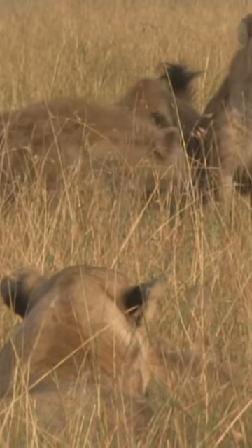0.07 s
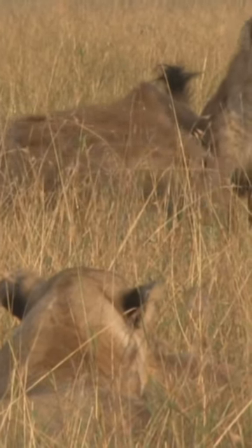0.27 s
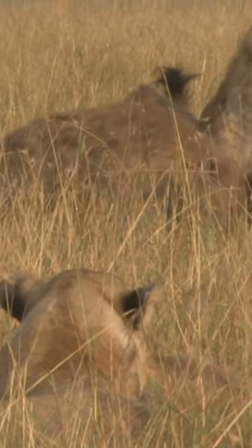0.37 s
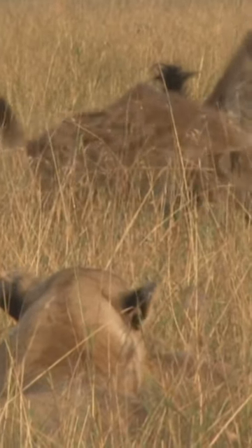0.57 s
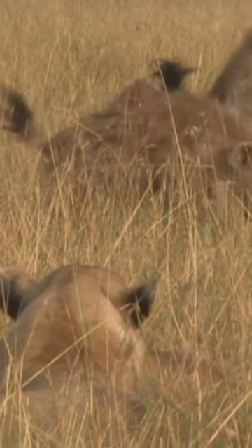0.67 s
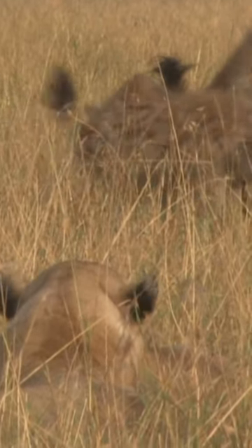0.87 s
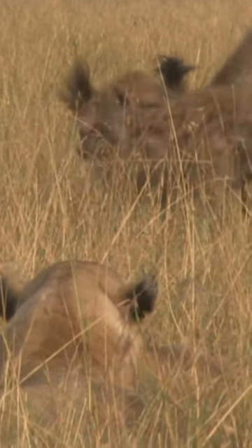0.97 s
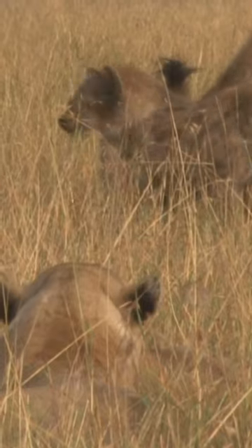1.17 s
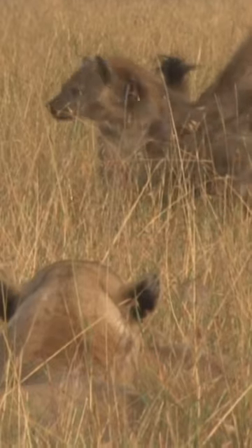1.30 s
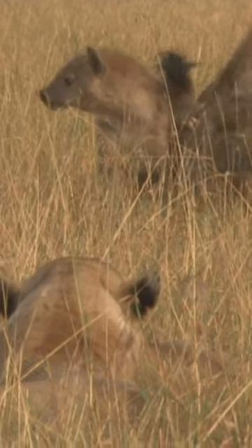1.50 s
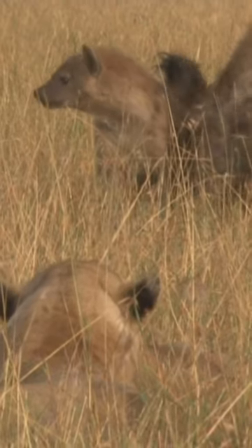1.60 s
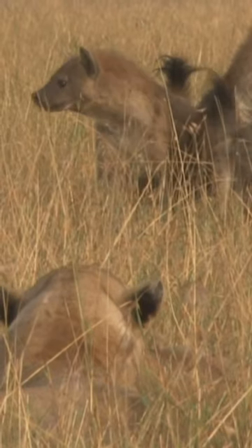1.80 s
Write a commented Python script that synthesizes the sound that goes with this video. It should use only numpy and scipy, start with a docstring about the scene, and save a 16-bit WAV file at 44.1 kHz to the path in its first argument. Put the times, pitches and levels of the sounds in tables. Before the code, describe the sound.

A hyena groans and rises into a harsh whoop over a low animal growl.

```python
"""A hyena whoops in open grassland. From the start, dry stalks swish over a low background, a big animal
growls in slow pulses that ring its throat, and the hyena groans, its vocal folds in period doubling.
A small bird whistles far off. The groan climbs, jumps an octave into the whoop, turns harsh as the folds
flutter, peaks as a squeal through the wide-open mouth and drops away by one second. The growl goes on;
bodies brush the grass, there is one soft knock, and the bird whistles again."""
import sys
import numpy as np
from scipy import signal
from scipy.fft import rfft, irfft, next_fast_len
from scipy.io import wavfile
from scipy.ndimage import uniform_filter1d

SR = 44100
rng = np.random.default_rng(int(sys.argv[2]) if len(sys.argv) > 2 else 0)


def waveform_to_disk(signal):
    """Save audio, clipped to [-1, 1], as 16-bit WAV at the path in sys.argv[1]."""
    frames = np.transpose(np.atleast_2d(signal))
    scaled = np.clip(frames, -1, 1) * 32767
    samples = np.round(scaled).astype(np.int16)
    wavfile.write(sys.argv[1], SR, samples)


N = 81585
T = np.arange(N) / SR
TOP_HZ = 15200
SIDE = np.array([[1], [-1]])  # opposite polarity in left and right


def undb(db):
    """The decibel scale: 20 dB is a factor of ten in amplitude."""
    return 10 ** (np.asarray(db) / 20)


def curve(table, column=1):
    """Linear interpolation of one column of a table over time."""
    rows = np.array(table, float)
    return np.interp(T, rows[:, 0], rows[:, column])


def response(points, hz):
    """Frequency response: the gain of a (Hz, dB) outline, interpolated in log frequency."""
    rows = np.array(points, float)
    return undb(np.interp(np.log(np.maximum(hz, 1)), np.log(rows[:, 0]), rows[:, 1]))


def colour(x, points):
    """Linear filtering: the spectrum is multiplied by a (Hz, dB) outline."""
    size = next_fast_len(N + 4096)
    hz = np.arange(size // 2 + 1) * SR / size
    return irfft(rfft(x, size) * response(points, hz), size)[:N]


def noise(points):
    """Spectral shaping of white noise, scaled to rms 1."""
    x = colour(rng.standard_normal(N), points)
    return x / x.std()


def wander(hz):
    """Random modulation: noise low-passed at hz, with standard deviation 1."""
    step = 16
    times = T[::step]
    lowpass = signal.butter(2, hz * step, fs=SR, output="sos")
    x = signal.sosfilt(lowpass, rng.standard_normal(2 * len(times)))[len(times):]
    return np.interp(T, times, x / x.std())


def bell(x, centre, width):
    """A Gaussian curve of height 1."""
    return np.exp(-.5 * ((x - centre) / width) ** 2)


def ring(x, modes):
    """Forced resonance: a sound drives modes given as (Hz, bandwidth in Hz, dB)."""
    return sum(undb(db) * signal.lfilter(*signal.iirpeak(hz, hz / width, fs=SR), x)
               for hz, width, db in modes)


# Stereo width of the noises. Each row: frequency in Hz, side gain in dB.
NOISE_SIDE = [(30, -11.5), (300, -9.5), (1000, 1), (2400, -2), (5000, -4.5), (15000, -18)]
def wide_noise(points):
    """Partial coherence: an independent side noise makes left and right differ."""
    return noise(points) + colour(noise(points), NOISE_SIDE) * SIDE


# Background of the plain. Each row: frequency in Hz, relative density in dB.
FIELD_SPECTRUM = [(20, -26), (69, 6), (147, 2), (272, -4.5), (429, -6.5), (561, -8.5), (695, -16),
                  (959, -16), (1510, -32.5), (2320, -25), (4420, -30.5), (5330, -36), (9880, -40),
                  (11300, -54.5), (12200, -40), (15200, -50)]
def field(level_db=-62.5, swell_db=1):
    """Ambient noise: a low, steady rush under slight, slow amplitude modulation."""
    return undb(level_db + swell_db * wander(3)) * wide_noise(FIELD_SPECTRUM)


# Swish of the stalks. Each row: frequency in Hz, relative density in dB.
STALK_SPECTRUM = [(600, 8), (1500, 6), (2700, 3.5), (4000, 0), (5200, -2), (6800, -4.5), (8500, -10),
                  (11000, -18), (13000, -24.5), (15000, -32.5)]
# Its envelope. Each row: time in seconds, level in dB.
STALK_LEVEL = [(0, -68), (.5, -68.5), (.7, -65), (1.0, -69.5), (1.25, -72), (1.6, -68.5), (1.85, -69.5)]
def stalks():
    """Friction noise: dry stalks swish throughout at a wavering level."""
    return undb(curve(STALK_LEVEL) + 1.3 * wander(25)) * wide_noise(STALK_SPECTRUM)


# Pitch of the folds, an octave above the groan. Each row: time in seconds, frequency in Hz.
FOLD_PITCH = [(0, 217.6), (.06, 215.6), (.1, 210.5), (.14, 215.3), (.216, 226.7), (.442, 257.4),
              (.502, 272.4), (.558, 284), (.595, 304.7), (.62, 338.8), (.66, 354.6), (.7, 386.2),
              (.732, 416.1), (.765, 442.6), (.784, 470.2), (.798, 495.4), (.81, 558), (.82, 589.3),
              (.848, 645.4), (.86, 660), (.872, 713), (.886, 710.8), (.906, 689.8), (.918, 633.5),
              (.936, 485.7), (.952, 365.3), (.975, 233.7)]
def vocal_folds(jitter=.0016):
    """Phase is the integral of frequency: one gliding oscillation drives both groan and whoop."""
    hz = uniform_filter1d(curve(FOLD_PITCH), size=400) * (1 + jitter * wander(33))
    return hz, 2 * np.pi * np.cumsum(hz) / SR


# The groan. Each row: time in seconds, then overall, odd-harmonic and upper-harmonic gains in dB.
GROAN_GAINS = [(0, -34.5, -27.5, -1), (.025, -35.5, -21.5, -4), (.06, -39.5, -1.5, 0.5),
               (.14, -40.5, -3, 0.5), (.2, -37.5, -3, -3.5), (.32, -35.5, 1, 0.5), (.41, -31.5, 1, 0),
               (.46, -30, 1, -5), (.5, -33, 4.5, -2.5), (.56, -29, 5.5, -7.5), (.595, -25.5, -4.5, -4),
               (.625, -33.5, 6, -9), (.66, -32.5, -2, 7.5), (.72, -51.5, -22, 12), (.79, -75.5, -4.5, 2)]
# The throat with the mouth nearly shut. Each row: frequency in Hz, gain in dB.
THROAT_RESPONSE = [(105, -35), (215, -9.5), (290, -3), (335, 4.5), (390, -2), (430, -10), (510, -23.5),
                   (630, -23), (745, -15), (860, -29), (1000, -31), (1250, -29.5), (1400, -37), (1490, -37),
                   (1600, -56), (1850, -44.5), (2300, -67.5)]
# A hollow throat resonance that swells and fades. Each row: time in seconds, gain in dB.
HOLLOW_GAIN = [(0, -12), (.06, 1.5), (.41, 1.5), (.5, -5), (.6, -5.5)]
# Air hissing through the nose. Each row: frequency in Hz, relative density in dB.
NOSE_SPECTRUM = [(1500, -28.5), (2600, -2), (3800, -10.5), (5400, -4), (6700, 4), (7600, -6.5), (9000, -19),
                 (11000, -40)]
def groan(fold_hz, phase, upper_from_hz=570, shimmer_db=2, hollow_hz=705, nose_db=-45.5):
    """Period doubling: the folds repeat at half their pitch, and the throat filters the harmonics."""
    half_phase = phase / 2 + .012 * wander(90)
    odd_gain, upper_db = undb(curve(GROAN_GAINS, 2)), curve(GROAN_GAINS, 3)
    voice = np.zeros(N)
    for k in range(1, 21):
        hz = k * fold_hz / 2
        upper_share = np.clip((hz - upper_from_hz) / 100 + .5, 0, 1)
        lag = rng.uniform(0, 2 * np.pi) * (k > 4)
        bright_db = upper_share * (upper_db + shimmer_db * wander(12))
        hollow_db = curve(HOLLOW_GAIN) * bell(hz, hollow_hz, width=63)
        gain = response(THROAT_RESPONSE, hz) * undb(bright_db + hollow_db) * odd_gain ** (k % 2)
        voice += gain * np.sin(k * half_phase + lag)
    return undb(curve(GROAN_GAINS)) * (np.sqrt(2) * voice + undb(nose_db) * noise(NOSE_SPECTRUM))


# The growl. Each row: time in seconds, pulses per second, drive level in dB.
GROWL_PULSES = [(0, 27, -31), (.075, 26, -36.5), (.12, 22.6, -37), (.2, 23.3, -41.5), (.27, 23.3, -41),
                (.6, 23.2, -41), (.72, 22.8, -43.5), (1.05, 23.9, -33), (1.25, 23.7, -36.5),
                (1.5, 23.5, -38), (1.605, 23, -40.5), (1.65, 21, -46.5), (1.72, 20, -74),
                (1.85, 20.5, -47.5)]
# Resonances of the growling throat. Each row: frequency in Hz, bandwidth in Hz, gain in dB.
GROWL_MODES = [(138, 12, 0), (159.2, 11.2, 6), (394.3, 24.5, 7), (621, 35, 8.5)]
def growl(pulse_at_s=1.0955, open_s=.00366, edge_s=.00064, direct_db=-7.5):
    """Impulse excitation: slack folds open and slap shut, and each push and pull rings the throat."""
    rate = curve(GROWL_PULSES)
    cycles = np.cumsum(rate) / SR
    cycles -= np.interp(pulse_at_s, T, cycles)
    nearest = np.round(cycles).astype(int)
    since_s = (cycles - nearest) / rate
    strength = undb(.9 * rng.standard_normal(100))[nearest] * undb(curve(GROWL_PULSES, 2))
    pulses = strength * (bell(since_s, 0, edge_s) - bell(since_s, open_s, edge_s))
    return undb(direct_db) * pulses + ring(pulses, GROWL_MODES)


# Whistles. Each row: start and length in seconds, first and last frequency in Hz, level in dB.
BIRD_NOTES = [(0.15, 0.16, 3470, 3390, -75), (1.62, 0.098, 3980, 3800, -76.5),
              (1.663, 0.09, 3190, 2800, -72.5), (1.731, 0.045, 4390, 4040, -77),
              (1.751, 0.071, 3430, 3120, -74)]
def bird(blur_radians=.9):
    """Frequency glides: thin falling whistles, blurred in phase and amplitude by distance."""
    whistles, blur = np.zeros(N), blur_radians * wander(89)
    for start, length, first_hz, last_hz, db in BIRD_NOTES:
        progress = np.clip((T - start) / length, 0, 1)
        hz = first_hz + (last_hz - first_hz) * progress ** 1.6
        whistles += undb(db) * np.sin(np.pi * progress) * np.sin(2 * np.pi * np.cumsum(hz) / SR + blur)
    return np.sqrt(2) * whistles * (1 + .47 * wander(79))


# The half-open and the wide-open mouth. Each row: frequency in Hz, gain in dB.
MOUTH_HALF = [(600, 18.5), (750, 7.5), (950, -4.5), (1120, -4), (1340, 6.5), (1480, -18), (1790, -10),
              (2050, -20), (2350, -18.5), (3000, -41), (4000, -15.5), (4600, -30), (5200, -18),
              (6300, -50.5), (15000, -76.5)]
MOUTH_WIDE = [(600, -7), (1000, 2), (1250, -5), (1430, -1), (1650, -33.5), (2000, -16.5), (2130, -23.5),
              (2500, -20), (3100, -37.5), (3800, -29.5), (4200, -30), (5000, -47), (6600, -35.5),
              (7500, -27.5), (8700, -45.5), (11000, -55), (15000, -50)]
# A band near 2 kHz that gives the voice its edge. Each row: time in seconds, gain in dB.
EDGE_GAIN = [(.63, 2), (.7, -3), (.74, 0.5), (.767, 8), (.79, -3), (.835, -5.5), (.88, -14), (.905, 2.5),
             (.92, 15), (.94, 6)]
def mouth(hz, opening, edge_hz=2080):
    """Formant filtering: the gain at each frequency changes as the mouth opens."""
    formants = response(MOUTH_HALF, hz) ** (1 - opening) * response(MOUTH_WIDE, hz) ** opening
    edge = undb(curve(EDGE_GAIN) * bell(hz, edge_hz, width=260))
    return formants * edge * (hz < TOP_HZ)


# The whoop. Each row: time in seconds, fundamental and overtone gains in dB, roughness from 0 to 1,
# half-tone gain in dB relative to the overtones, mouth opening from 0 to 1.
WHOOP_SHAPE = [(.56, -69, -98.5, 0, -13.5, 0.16), (.605, -51, -65, 0.11, 0.5, 0.4),
               (.645, -24.5, -59, 0.1, -1.5, 0), (.675, -23, -52.5, 0.3, -5, 0.07),
               (.7, -19, -46.5, 0.83, -1.5, 0.2), (.735, -21.5, -52.5, 0.77, -12, 0),
               (.763, -22, -45, 0, -29, 0.2), (.775, -27, -44.5, 0.3, -22, 0.08),
               (.81, -38, -42.5, 0.55, -26, 0.5), (.84, -33.5, -34.5, 0.18, -22, .7),
               (.875, -37.5, -37.5, 0.1, -43, 0.87), (.91, -38, -39, 0.11, -45, 0.96),
               (.924, -32, -55, 0.3, -26, 1), (.94, -37.5, -57, 0.55, -22, 0.9),
               (.965, -47, -75, 0.5, -24, 0), (.985, -73, -91.5, .4, 7, 0.08)]
# Catches in the voice. Each row: time in seconds, change of fundamental and of overtones in dB.
VOICE_CATCHES = [(0.657, -8, -5), (0.688, -9.5, -3), (.717, -12.5, -5), (.75, -2.5, -12.5),
                 (.773, -6, -3.5), (0.784, -3, -12.5), (0.819, -4, -8), (0.852, -5, -18), (.934, -12, 8)]
# Half tones at 1.5, 2.5 and 3.5 times the pitch. Each entry: relative gain in dB.
HALF_TONES_DB = [-15.5, 6.5, -28.5]
# Hiss of the harsh voice and of air in the wide mouth. Each row: frequency in Hz, relative density in dB.
RASP_SPECTRUM = [(130, -39.5), (400, 21.5), (800, 9.5), (1200, -2.5), (1700, -18.5), (2400, -18),
                 (3100, -28), (4000, -3.5), (4550, -7.5), (5200, -13.5), (6300, -21), (9000, -32.5),
                 (11000, -42.5)]
AIR_SPECTRUM = [(1500, -16), (3800, 4.5), (5500, -2), (7500, -0.5), (9500, -2.5), (11200, -13.5),
                (12800, -19.5), (15000, -7.5)]
def whoop(hz, phase, catch_s=.0034, flutter_radians=.15, fray_radians=1.3, rasp_db=6.5, air_db=-29):
    """Nonlinear vibration: strained folds flutter, catch and add half tones and hiss to the harmonics."""
    low_catch_db, high_catch_db = sum(np.outer([low_db, high_db], bell(T, at, catch_s))
                                      for at, low_db, high_db in VOICE_CATCHES)
    low_gain = undb(curve(WHOOP_SHAPE, 1) + low_catch_db)
    high_gain = undb(curve(WHOOP_SHAPE, 2) + high_catch_db)
    roughness, opening = curve(WHOOP_SHAPE, 3), curve(WHOOP_SHAPE, 5)

    def flutter():
        """Aperiodic vibration: a fresh random modulation, scaled by the roughness."""
        return roughness * np.tanh(wander(172))

    def partial(k):
        """Phase modulation: the partial at k times the pitch also wavers alone."""
        return mouth(k * hz, opening) * np.sin(k * phase + fray_radians * flutter())

    def flicker(k, depth_db=7.5):
        """Amplitude modulation, deeper for higher harmonics."""
        return undb(depth_db * np.log10(k - 1) * np.tanh(wander(60)))

    phase = phase + flutter_radians * flutter()
    overtones = sum(partial(k) * flicker(k) for k in range(2, 23)) * (1 + .7 * flutter())
    half_tones = sum(undb(db) * partial(k + .5) * (1 + .5 * wander(68))
                     for k, db in enumerate(HALF_TONES_DB, 1))
    half_tones *= undb(curve(WHOOP_SHAPE, 4))
    voice = low_gain * np.sin(phase) + high_gain * (overtones + half_tones)
    rasp = undb(rasp_db) * roughness ** 2 * (1 - opening) * noise(RASP_SPECTRUM)
    air = undb(air_db - high_catch_db) * opening * noise(AIR_SPECTRUM)  # flows on through the catches
    hiss = high_gain * (rasp + air) * (1 + .43 * np.cos(phase))
    sounding = (T > WHOOP_SHAPE[0][0]) & (T < WHOOP_SHAPE[-1][0])
    return sounding * (np.sqrt(2) * voice + hiss)


# Tones that outlast the sweep. Each row: frequency in Hz, bandwidth in Hz, gain in dB.
AFTER_MODES = [(473.3, 13, -4.5), (596, 10, -2)]
def after_ring(call):
    """Free decay: narrow resonances ring on after the call sweeps through them."""
    return ring(call, AFTER_MODES)


# Brushes. Each row: peak time and width in seconds, level in dB, crisp band in Hz, its level in dB.
BRUSHES = [(1.318, 0.033, -55, 2060, -66), (1.434, 0.016, -63, 2180, -71), (1.561, 0.036, -60.5, 1980, -74),
           (1.595, 0.012, -58, 3240, -68.5)]
# Brushed grass. Each row: frequency in Hz, relative density in dB.
BRUSH_SPECTRUM = [(300, 7), (700, -5), (1300, -8.5), (1650, -12.5), (2100, -9.5), (3100, -15.5),
                  (4600, -16.5), (8000, -35), (14000, -63)]
def rustles(skirt_db=-60):
    """Friction noise in bursts: bodies brush through the grass, each brush with its own crisp band."""
    out = np.zeros((2, N))
    for at, width, db, crisp_hz, crisp_db in BRUSHES:
        band = [(crisp_hz / 2, skirt_db), (crisp_hz, 0), (crisp_hz * 2, skirt_db)]
        crisp = undb(crisp_db) * wide_noise(band)
        swish = undb(db + 1.5 * wander(105)) * wide_noise(BRUSH_SPECTRUM)
        out += bell(T, at, width) * (swish + crisp)
    return out


# A soft knock. Each row: frequency in Hz, relative density in dB.
THUD_SPECTRUM = [(150, -22), (320, 4), (3000, -70)]
def thud(at_s=1.334, width_s=.004, level_db=-50):
    """A transient: a brief burst of low noise is heard as a dull knock within the biggest rustle."""
    return undb(level_db) * bell(T, at_s, width_s) * noise(THUD_SPECTRUM)


# How much the call differs between the ears. Each row: frequency in Hz, side gain in dB.
CALL_SIDE = [(200, -15), (380, -20.5), (650, -10), (1400, -12.5), (2500, -17), (5000, -27), (12000, -17.5)]
def ground_bounce(call):
    """Interaural phase difference: ground reflection shifts the call a little between the ears."""
    return call + colour(signal.hilbert(call).imag, CALL_SIDE) * SIDE


def pan(x, db):
    """Interaural level difference: positive db places a sound left, negative right."""
    return x * undb(SIDE * db / 2)


def scatter(x, db, t60_s=.52, cutoff_hz=804, side_db=-6):
    """Scattering: grass and ground return a faint, dull, short tail, different in each ear."""
    tail = rng.standard_normal((2, SR // 2)) * undb(-60 * T[:SR // 2] / t60_s)
    tail /= np.sqrt(np.sum(tail ** 2, axis=1, keepdims=True))
    dull = signal.sosfilt(signal.butter(3, cutoff_hz, fs=SR, output="sos"), x)
    mid, side = undb(db) * signal.fftconvolve(dull[None], tail, axes=1)[:, :N]
    return mid + undb(side_db) * side * SIDE


def scene():
    """Superposition: call, growl and their echoes add to the quiet sounds of the plain."""
    hz, phase = vocal_folds()
    call = groan(hz, phase) + whoop(hz, phase)
    call += after_ring(call)
    rumble = growl()
    background = field()
    direct = ground_bounce(call) + pan(rumble, db=-1.9)
    echoes = scatter(call, db=-20) + scatter(rumble, db=-16.5)
    return background + direct + echoes + stalks() + rustles() + thud() + bird()


def record(dry):
    """Band limiting: a steep low-pass filter removes the highest treble."""
    return signal.sosfilt(signal.ellip(10, .2, 80, TOP_HZ, fs=SR, output="sos"), dry)


dry = scene()
out = record(dry)
waveform_to_disk(out)
```